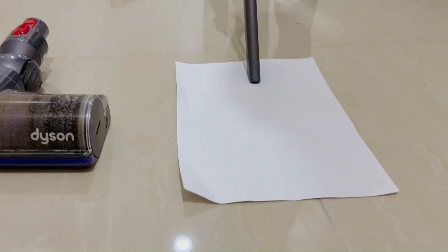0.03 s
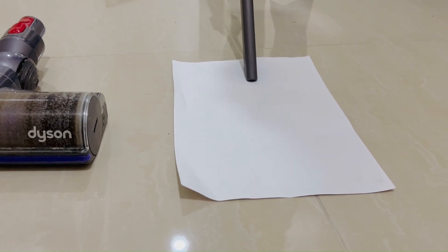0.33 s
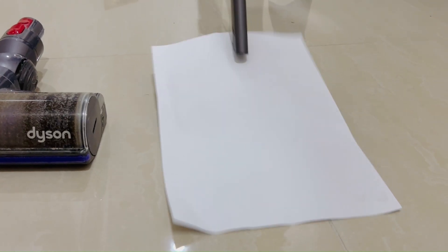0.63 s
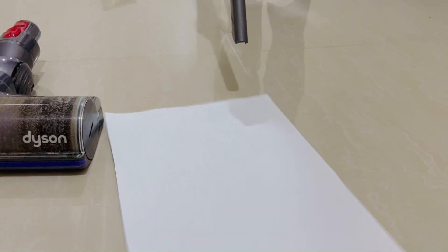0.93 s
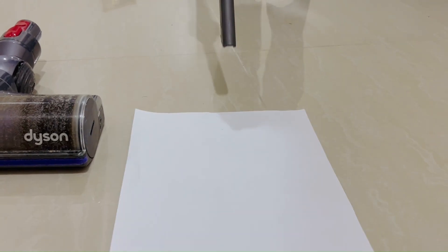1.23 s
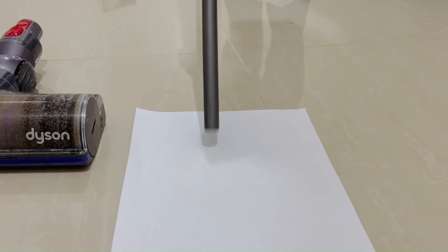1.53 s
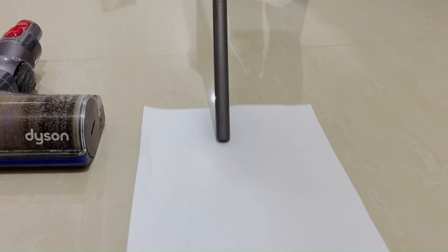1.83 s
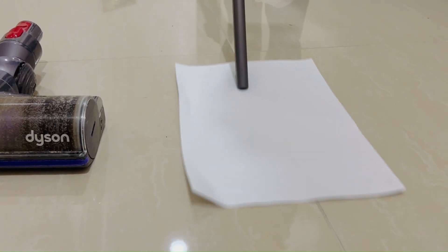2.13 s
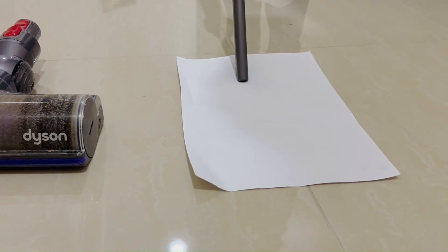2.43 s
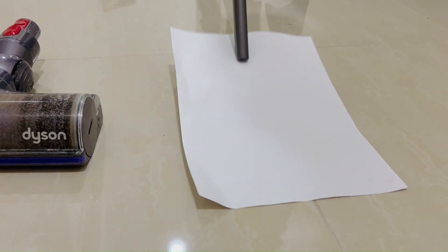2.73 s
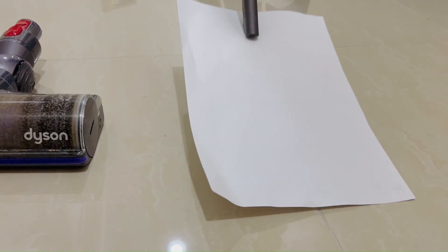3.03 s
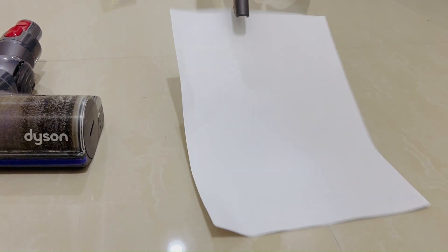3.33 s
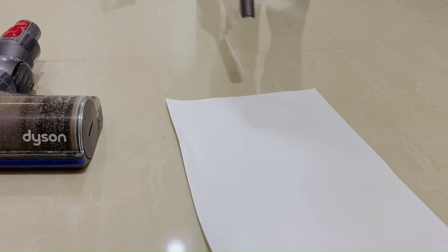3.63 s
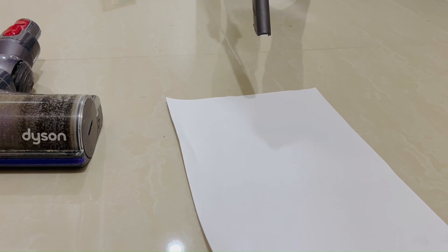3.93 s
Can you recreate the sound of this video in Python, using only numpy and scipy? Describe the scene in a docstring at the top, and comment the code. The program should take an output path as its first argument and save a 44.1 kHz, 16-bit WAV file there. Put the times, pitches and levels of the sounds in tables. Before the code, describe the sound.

In a small tiled room, a handheld vacuum runs with a high whine and airy hiss, heard in stereo. It winds down, dropped paper lands faintly, then it snaps back on, its suction whistling upward and holding steady.

```python
"""A whine over rushing air: a handheld vacuum cleaner on a tiled floor, heard on a stereo microphone pair.
It is released, coasts down, restarts with a snap and is released again. The shaft speed sets the pitch
of the whine and the strength of the air in the ducts. Breathy whistles glide with the suction.
In the pause a low tube note rings, a dropped sheet of paper flicks on the tiles and the wand ticks."""
import sys
import numpy as np
from scipy import signal
from scipy.fft import rfft, irfft
from scipy.io import wavfile
from scipy.ndimage import uniform_filter1d

SR = 44100
rng = np.random.default_rng(int(sys.argv[2]) if len(sys.argv) > 2 else 0)


def int16_out(signal):
    """Quantize to a 16-bit WAV file."""
    q = np.round(np.clip(np.atleast_2d(signal).T, -1, 1) * 32767)
    wavfile.write(sys.argv[1], SR, q.astype(np.int16))


N = 176400
T, HZ = np.arange(N) / SR, np.maximum(np.fft.rfftfreq(N, 1 / SR), 1)
SIDES = np.array([[1], [-1]])  # left and right microphone
FULL_SPEED_HZ = 950

def undb(db):
    return 10 ** (np.asarray(db) / 20)

def curve(rows, column=1):
    """One column of a table, joined by straight lines in time."""
    rows = np.array(rows)
    return np.interp(T, rows[:, 0], rows[:, column])

def across(rows, column=1):
    """One column of a table, joined on a log-frequency axis."""
    rows = np.array(rows)
    return np.interp(np.log(HZ), np.log(rows[:, 0]), rows[:, column])

def wander(rate_hz):
    """Smooth random drift with a spread of 1."""
    hold = int(SR / rate_hz)
    steps = np.repeat(rng.standard_normal(N // hold + 1), hold)
    drift = uniform_filter1d(uniform_filter1d(steps, hold), hold)[:N]
    return drift / drift.std()

def bell(hz, width_hz):
    """Power response of a resonance."""
    return 1 / (1 + (2 * (HZ - hz) / width_hz) ** 2)

# The microphone pair. Each row: frequency in Hz, likeness from 0 to 1, lead of the left in radians.
MIC_PAIR = [(60, .97, 0), (300, .8, 0), (650, .55, .3), (950, .5, 1.3), (1300, .15, 1.5), (1550, .35, 2.8),
            (1850, .55, .3), (2900, .68, .8), (3400, .55, 1.2), (4100, .4, -.3), (4700, .68, .4),
            (5300, .2, 0), (5700, .25, -1.8), (6500, .68, -.1), (7300, .8, -.1), (8500, .7, -1.6),
            (10000, .97, -3.1), (11200, .7, -4.4), (13000, .9, -6.3), (14300, .6, -7.6), (15700, .9, -9.4)]
def noise(gain):
    """Coloured noise of rms 1 as the two microphones hear it."""
    shared, left, right = rfft(rng.standard_normal((3, N)))
    likeness = np.clip(across(MIC_PAIR), 0, 1)
    turn = np.exp(.5j * across(MIC_PAIR, 2) * SIDES)
    spectrum = np.sqrt(likeness) * shared * turn + np.sqrt(1 - likeness) * np.array([left, right])
    x = irfft(gain * spectrum, N)
    return x / x.std()

def gliding_noise(hz, width_hz):
    """Noise of rms 1 in a narrow resonance whose centre moves."""
    centre = hz.mean()
    band = signal.hilbert(noise(np.sqrt(bell(centre, width_hz) * bell(centre, 2 * width_hz))))
    return np.real(band * np.exp(2j * np.pi * np.cumsum(hz - centre) / SR))

def room(x, wet_db, t60_s=.33):
    """Adds the tail of a small tiled room."""
    t = T[:SR]
    tail = rng.standard_normal((2, SR)) * np.exp(-np.log(1000) * t / t60_s) * (t > .004)
    tail /= np.sqrt(np.sum(tail[0] ** 2))
    return x + undb(wet_db) * signal.fftconvolve(x, tail, axes=1)[:, :N]

def bursts(events, colour, wet_db, rise_s=.00042):
    """Short bursts of noise that rise at once and die away in the room."""
    envelope = 0
    for start, db, decay_s in events:
        age = np.maximum(T - start, 0)
        envelope += undb(db) * (1 - np.exp(-age / rise_s)) * np.exp(-age / decay_s)
    return room(envelope * noise(undb(across(colour))), wet_db)

def rough_tone(phase, lead_rad, roughness):
    """A tone of rms near 1 that wavers roughly in level and phase; the left microphone leads by lead_rad."""
    drift = np.array([wander(70) + 1j * wander(70) for _ in range(2)])
    scatter = 1 + roughness * drift / np.sqrt(2)
    carrier = np.exp(1j * (phase + lead_rad / 2 * SIDES))
    return np.sqrt(2 / (1 + roughness ** 2)) * np.imag(scatter * carrier)

# The motor under power, one list per run. Each row: time in seconds, shaft rate in Hz.
RUNS = [
    [(0, 947.7), (.1, 949.6), (.27, 957), (.45, 959.5), (.61, 956.2)],
    [(1.572, 39.8), (1.585, 314.6), (1.605, 522.5), (1.615, 800.7), (1.7, 859.7), (1.8, 910.4),
     (1.95, 941.2), (2.06, 948.6), (2.32, 959.4), (2.5, 958), (2.75, 955.6), (3.22, 949.6), (3.36, 945),
     (3.805, 945.6)],
]
def shaft_rate(drag_s=.27, friction_s=.7):
    """The shaft is driven along each run, then slowed by air drag and bearing friction."""
    hz = 0
    for run in RUNS:
        driven = curve(run) * (T >= run[0][0])
        off_s = np.maximum(T - run[-1][0], 0)
        hz = np.maximum(hz, driven * np.exp(-off_s / friction_s) / (1 + off_s / drag_s))
    return hz

# The fan's whine at the microphones. Each row: time in seconds, relative level in dB at full speed.
WHINE = [(0, -44), (.07, -30), (.16, -43), (.26, -30), (.35, -44), (.42, -34), (.55, -37.5), (.6, -27),
         (.618, -33), (.66, -33), (1.62, -35), (1.72, -29), (1.8, -37), (1.93, -30.5), (2.02, -43),
         (2.1, -34), (2.16, -39), (2.32, -32), (2.52, -36), (2.59, -45), (2.64, -36), (2.69, -42),
         (2.76, -29.5), (2.82, -30), (2.88, -42), (2.96, -32), (3.07, -44.5), (3.21, -33.5), (3.29, -46),
         (3.37, -35), (3.795, -34.5), (3.815, -38), (3.85, -26)]
def blade_whine(angle, speed, blades=9):
    """The passing fan blades make a whine that grows steeply with speed."""
    tone = rough_tone(blades * angle, lead_rad=-1.82, roughness=.2)
    return room(tone * undb(curve(WHINE) + .4) * speed ** 4.8, wet_db=-13)

# From the motor. Each row: time in seconds, then levels of tone and overtone in dB at full speed.
SHAFT_LEVELS = [(0, -30, -54), (.25, -44, -54), (.55, -42, -56), (.72, -46, -63.5), (1.68, -37.5, -65),
                (2.03, -36.5, -56), (2.2, -43, -56), (2.55, -37.5, -56), (2.8, -44, -51), (3.1, -47, -46),
                (3.25, -39, -44), (3.45, -33, -43), (3.8, -35, -47), (3.9, -36, -60)]
def shaft_tones(angle, speed):
    """The spinning shaft sounds just under its own rate, with an overtone at seven times that rate."""
    tone = rough_tone(.99 * angle, lead_rad=1.4, roughness=.25) * undb(curve(SHAFT_LEVELS))
    overtone = rough_tone(7 * angle, lead_rad=0, roughness=.25) * undb(curve(SHAFT_LEVELS, 2))
    return (tone + overtone) * speed ** 3.8

# The rush as heard outside the cleaner. Each row: frequency in Hz, relative level in dB.
RUSH_COLOUR = [(30, -24), (60, -11), (110, -13), (205, -9), (320, -3.5), (520, -6), (850, 1), (1150, -0.5),
               (1550, -1.2), (2150, -6), (2900, -1), (4400, -3.5), (5600, -0.5), (6700, -4.5), (7300, -8.5),
               (8300, -9), (9000, -9), (9600, -24.5), (10500, -10.5), (11900, -10), (13500, -15.5),
               (15000, -16.5), (16000, -30)]
# Resonances inside the ducts. Each row: frequency in Hz, width in Hz, lift in dB.
DUCT_MODES = [(78, 14, 6), (153, 23, 7.2), (313, 28, 4.5), (339.3, 12, 6.5), (495, 23, 11.5),
              (554.5, 42, 8.5), (664, 36, 5), (833, 30, 1.5), (1200, 22, -5.2), (1450, 26, 9),
              (1665, 40, 4.5), (2450, 20, 4.5), (2692, 24, 8.5), (3610, 75, 3), (3840, 75, 6),
              (4290, 90, 3.5), (5195, 23, 7), (5870, 79, 0), (6120, 90, 4), (6980, 120, 2.5)]
# How the rush grows. Each row: band centre in Hz, exponent of the speed.
RUSH_GROWTH = [(110, 3.2), (420, 2.34), (1100, 2.06), (2600, 2.85), (5200, 3.8), (8200, 3.46), (12500, 6.4)]
# The rush at the microphones. Each row: time in seconds, then body and treble in dB at full speed.
RUSH_LEVELS = [(0, -24.5, -25), (.58, -25, -26), (1.25, -24.5, -24), (1.595, -17, -14),
               (1.635, -20.5, -19.5), (1.71, -26, -21.5), (1.86, -26.5, -23.5), (2.3, -25.5, -25.5),
               (2.8, -25, -27), (3.2, -25.5, -26.5), (3.7, -26, -27), (3.96, -25, -25.5)]
def air_rush(speed, lag_s=.07, ripple_step_hz=28, flicker_db=.6):
    """Turbulence in the resonant ducts; the treble dies first as the fan slows."""
    keep = np.exp(-1 / (lag_s * SR))
    lagged = signal.lfilter([1 - keep], [1, -keep], speed, zi=[speed[0]])[0]
    flow = np.maximum(speed, lagged)  # the air lags only while slowing
    # Many small duct and room resonances ripple the spectrum.
    knots = np.arange(0, SR / 2, ripple_step_hz)
    ripple_db = 2 * np.interp(HZ, knots, rng.standard_normal(len(knots))) * np.minimum(HZ / 1500, 1)
    ducts_db = sum(db * bell(hz, width) for hz, width, db in DUCT_MODES)
    spectrum = rfft(noise(undb(across(RUSH_COLOUR) + ripple_db + ducts_db)))
    out = 0
    for centre, exponent in RUSH_GROWTH:
        band = across([(hz, float(hz == centre)) for hz, _ in RUSH_GROWTH])
        treble = min(centre / 9000, 1)
        db = (1 - treble) * curve(RUSH_LEVELS) + treble * curve(RUSH_LEVELS, 2)
        out += irfft(spectrum * band, N) * flow ** exponent * undb(db + flicker_db * wander(18))
    return out

# Flutter in the airstream. Each row: time in seconds, level in dB.
FLUTTER = [(0, -46), (.55, -49), (.68, -41), (.76, -48), (.9, -66), (1.1, -100), (1.6, -100), (1.66, -39),
           (1.81, -36), (1.9, -42), (2.03, -42), (2.15, -50), (3.8, -52), (3.86, -40), (4, -54)]
# A whistle in the same stream. Each row: time in seconds, pitch in Hz, level in dB.
WHISTLE = [(0, 3140, -42), (.55, 3131, -45), (.68, 3012, -43.5), (.8, 2614, -47.5), (.9, 2376, -57),
           (1.06, 2275, -67), (1.3, 2201, -90), (1.59, 2286, -92), (1.635, 2559, -32), (1.73, 2935, -38),
           (1.84, 3120, -33), (2, 3140, -37), (2.15, 3160, -41), (2.7, 3147, -40.5), (3.15, 3155, -41),
           (3.8, 3174, -46), (4, 2595, -46)]
def suction_whistles(shaft_hz):
    """The flow flutters around the shaft rate, and a breathy whistle glides with the suction."""
    flutter = gliding_noise(shaft_hz, width_hz=70) * undb(curve(FLUTTER))
    return flutter + gliding_noise(curve(WHISTLE), width_hz=200) * undb(curve(WHISTLE, 2))

# The room around the microphones. Each row: frequency in Hz, relative level in dB before the roll-off.
RUMBLE_COLOUR = [(25, -26), (55, -5), (80, 5.5), (115, -12), (200, -19.5), (330, -28), (900, -39),
                 (1700, -34), (2600, -48)]
def room_rumble():
    """Low rumble of the quiet room, rolled off above 3 kHz."""
    return undb(-54) * noise(undb(across(RUMBLE_COLOUR)) / np.hypot(1, HZ / 3000) ** 2)

# A thin ring from the cleaner. Each row: time in seconds, pitch in Hz, level in dB.
HIGH_RING = [(.7, 5000, -80), (.87, 4980, -58.5), (.97, 4900, -61), (1.05, 4900, -59.5), (1.16, 5020, -72),
             (1.27, 5160, -76.5), (1.33, 5130, -84), (1.39, 5130, -105)]
# A fainter ring below it. Each row: time in seconds, level in dB.
LOW_RING = [(.9, -80), (1.1, -72), (1.24, -76), (1.37, -91.5)]
def coasting_rings():
    """Two diffuse rings swell while the rotor coasts."""
    high = gliding_noise(curve(HIGH_RING), width_hz=290) * undb(curve(HIGH_RING, 2))
    return high + noise(bell(3850, width_hz=450)) * undb(curve(LOW_RING))

# From the tube, in the pause. Each row: time in seconds, pitch in Hz, level in dB.
TUBE = [(.79, 110.7, -78), (.836, 128, -45), (.9, 142, -49), (.99, 150, -45), (1.06, 154.7, -55),
        (1.15, 156, -57), (1.4, 158, -61), (1.57, 159, -60.5), (1.62, 158, -75)]
def tube_note():
    """The tube rings with a low note that rises as the flow dies."""
    note = np.sqrt(2) * np.sin(2 * np.pi * np.cumsum(curve(TUBE)) / SR)
    return note * undb(curve(TUBE, 2)) * (T > TUBE[0][0]) * (T < TUBE[-1][0])

# Paper landing down on the tiles. Each row: start in seconds, level in dB, decay in seconds.
FLICKS = [(.9147, -37, 0.0035), (.9225, -47, .003), (.932, -46, 0.003), (.9515, -47, 0.003),
          (.9555, -48, .003), (1.0963, -55, 0.005), (1.1135, -54, 0.0025), (1.137, -56, 0.0035),
          (1.168, -63, .003)]
# The sheet sliding along the floor. Each row: time in seconds, level in dB.
SLIDE = [(.9, -100), (.93, -58), (1, -69), (1.08, -65), (1.14, -66), (1.2, -81), (1.26, -100)]
# Colours of the flicks and of the slide. Each row: frequency in Hz, relative level in dB.
FLICK_COLOUR = [(200, -12.5), (2000, -15.5), (5000, 3), (6800, 7.5), (9000, -1), (13000, -1), (16000, -11)]
SLIDE_COLOUR = [(1000, -21), (5000, 0.5), (7000, 0.5), (9500, -7.5), (13500, -3.5), (16000, -8)]
def paper(crackles_per_s=600, spread_db=3, decay_s=.0007, wet_db=-5.5):
    """The sheet flicks as it lands, then crackles faintly as it slides and settles."""
    grains = (rng.random(N) < crackles_per_s / SR) * undb(spread_db * rng.standard_normal(N))
    crackle = signal.lfilter([1], [1, -np.exp(-1 / (decay_s * SR))], grains)
    crackle /= np.sqrt(np.mean(crackle ** 2))
    slide = noise(undb(across(SLIDE_COLOUR))) * crackle * undb(curve(SLIDE))
    return bursts(FLICKS, FLICK_COLOUR, wet_db) + room(slide, wet_db)

# Ticks up at the hand. Each row: start in seconds, level in dB, decay in seconds.
TICKS = [(1.3846, -63.5, 0.023), (1.4584, -62, .008), (1.478, -70, 0.15)]
# Their colour. Each row: frequency in Hz, relative level in dB.
TICK_COLOUR = [(200, -7), (1500, 2), (3000, -5), (4250, -3), (4550, 5), (4900, -4), (6200, 1), (8000, -9),
               (15000, -7)]
def wand_ticks():
    """The wand ticks faintly in the hand, with plenty of room around it."""
    return bursts(TICKS, TICK_COLOUR, wet_db=-1.5)

# Snap and thump at the cleaner's body. Each row: start in seconds, level in dB, decay in seconds.
SNAPS = [(1.612, -14, 0.0016), (1.6144, -3, 0.0012), (1.6178, -13, 0.0042), (1.635, -25, 0.0069)]
THUMPS = [(1.605, -34.5, 0.05)]
# Their colours. Each row: frequency in Hz, relative level in dB.
SNAP_COLOUR = [(100, -28), (1000, -24), (1650, -5), (1930, 7.5), (2200, 4.5), (2500, -2), (3300, 0),
               (3800, -2), (4350, -8), (4800, 3.5), (5500, -12), (6900, -3), (8500, -12.5), (12000, -13.5),
               (16000, -16)]
THUMP_COLOUR = [(30, -26), (75, -5), (115, -6.5), (200, -20), (600, -44), (3000, -90)]
def restart(wet_db=-6):
    """The motor restarts with a snap, and its torque thumps the body."""
    return bursts(SNAPS, SNAP_COLOUR, wet_db) + bursts(THUMPS, THUMP_COLOUR, wet_db)

# Down at the nozzle. Each row: middle and length in seconds, pitch and width in Hz, level in dB.
NOZZLE = [(1.91, .17, 4880, 90, -39), (2.09, .12, 2690, 90, -39), (2.17, .08, 500, 90, -40),
          (2.3, .2, 2730, 90, -38), (3.7, .4, 2443, 20, -42)]
def nozzle_whistles():
    """Brief whistles swell and fade where the nozzle meets the sheet."""
    out = 0
    for middle, length_s, hz, width_hz, db in NOZZLE:
        swell = np.exp(-(2 * (T - middle) / length_s) ** 2)
        out += noise(bell(hz, width_hz)) * undb(db) * swell
    return out

# At the wand's open end. Each row: time in seconds, level in dB.
DRONE = [(2.2, -73), (2.6, -64), (3.1, -48), (3.5, -52.5), (3.85, -48.5), (4, -59)]
def wand_drone():
    """The open wand drones at a low resonance as the paper lifts."""
    return noise(bell(149, width_hz=20)) * undb(curve(DRONE))

def scene(jitter=.0004):
    """One shaft drives the motor tones and the air; rings, knocks, paper and the room join them."""
    shaft_hz = shaft_rate()
    speed = shaft_hz / FULL_SPEED_HZ
    angle = 2 * np.pi * np.cumsum(shaft_hz * (1 + jitter * wander(60))) / SR
    motor = blade_whine(angle, speed) + shaft_tones(angle, speed)
    air = air_rush(speed) + suction_whistles(shaft_hz) + nozzle_whistles() + wand_drone()
    pause = coasting_rings() + tube_note() + paper() + wand_ticks()
    return motor + air + room_rumble() + pause + restart()

def record(dry, lean_db=.22, top_hz=15750):
    """The recorder leans a little to the left and cuts the top."""
    lowpass = signal.ellip(10, .2, 80, top_hz, fs=SR, output="sos")
    return signal.sosfilt(lowpass, dry * undb(lean_db * SIDES))

dry = scene()
out = record(dry)
int16_out(out)
```